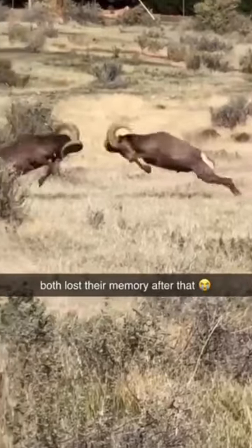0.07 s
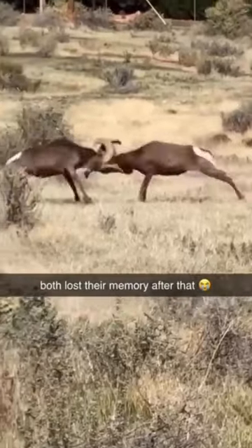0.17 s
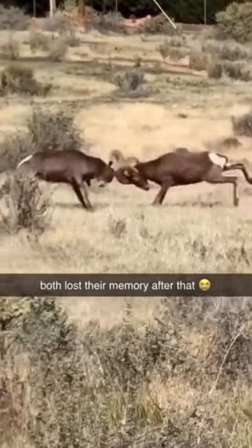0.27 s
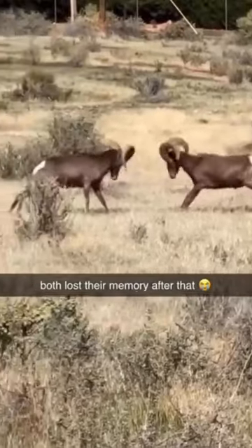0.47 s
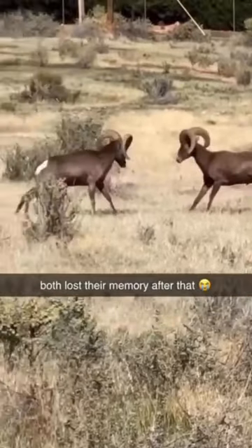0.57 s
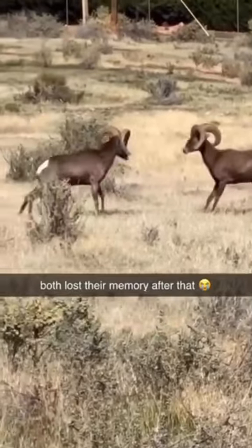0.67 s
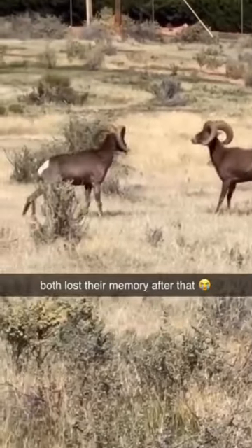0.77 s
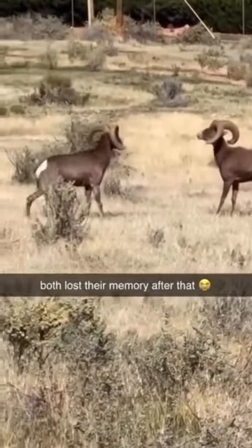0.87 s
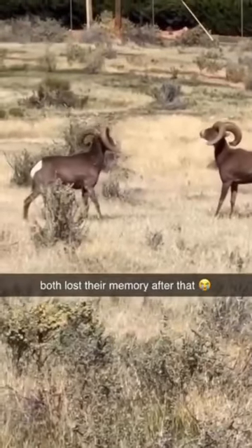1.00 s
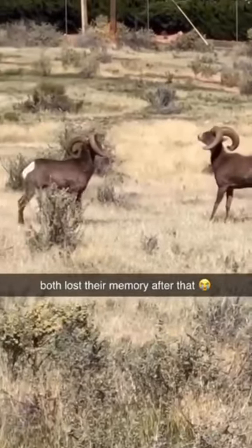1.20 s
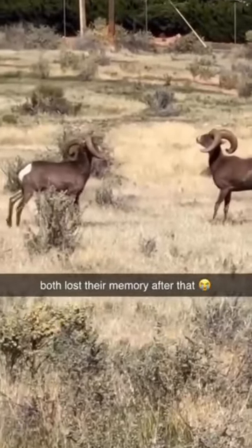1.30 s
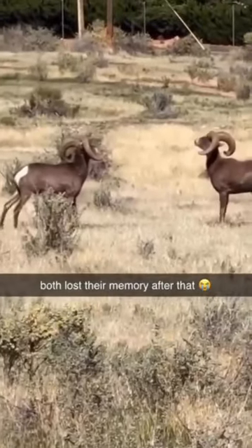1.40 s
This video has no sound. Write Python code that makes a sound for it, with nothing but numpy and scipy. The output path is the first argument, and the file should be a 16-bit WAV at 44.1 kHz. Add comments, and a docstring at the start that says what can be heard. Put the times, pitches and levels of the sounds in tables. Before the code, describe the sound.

One loud crack of clashing horns echoes faintly over light wind and a distant engine.

```python
"""Two bighorn rams butt heads in a dry meadow: five horn contacts within 60 ms, each a snap, a ring
and a splintering crack. Locked ridges grind, skulls knock, bodies thump, hooves brush dry grass.
Scrub scatters the clash and far slopes throw it back, over a light breeze and a distant idling
engine. The crack overloads the microphone."""
import sys
import numpy as np
from scipy import signal
from scipy.fft import rfft, irfft
from scipy.io import wavfile
from scipy.ndimage import uniform_filter1d

SR = 44100
rng = np.random.default_rng(int(sys.argv[2]) if len(sys.argv) > 2 else 0)


def to_wav(s):
    """Save 16-bit WAV."""
    ch = np.atleast_2d(s).T  # columns
    pcm = np.round(np.clip(ch, -1, 1) * 32767)  # PCM
    wavfile.write(sys.argv[1], SR, pcm.astype(np.int16))


N = 63945

# engine harmonics: multiple of rotation rate, level/dB
ENGINE_LINES = [(2, -50), (3, -33), (5, -41), (6, -43)]
# engine rumble: f/Hz, level/dB
RUMBLE_SPECTRUM = [(20, -40), (35, -22), (50, -23), (72, 1.5), (90, -12), (110, -14.5), (140, -12),
                   (175, -13), (210, -16.5), (300, -32), (600, -55)]
# moving air: f/Hz, level/dB
BREEZE_SPECTRUM = [(100, -13), (220, -2.5), (320, -1), (560, -4.5), (900, 1), (1100, -8), (1600, -11),
                   (2300, -19), (4000, -23.5), (7000, -31), (11500, -40.5)]
# breeze strength: t/s, level/dB
BREEZE_LEVELS = [(0, -45.5), (.6, -41.5), (.88, -44.5), (1.08, -41.5), (1.45, -43)]
# hooves in grass: t/s, level/dB, attack/s, decay/s
HOOF_RUSTLES = [(.158, -43, .016, 0.12), (0.234, -28.5, 0.011, 0.036)]
# dry stalks: f/Hz, level/dB
GRASS_SPECTRUM = [(300, 13), (1500, 2.5), (3500, 0.5), (7000, -5), (11500, -16.5)]
# splintering and grinding horn: f/Hz, level/dB
SPLINTER_SPECTRUM = [(200, -30), (540, -35), (680, 5), (1100, 3.5), (2200, -5), (3500, -6.5), (4700, -16),
                     (6000, -20), (7000, -26), (11500, -35)]
# horn contacts: t/s, snap/dB, snap end f/Hz, snap decay/s, relative ring/dB, splinter/dB, splinter decay/s
HORN_CONTACTS = [(0.2225, 2.5, 867, 0.0025, -2, -12.5, 0.0026),
                 (0.2254, -7.5, 1080, 0.00033, -4, -6.5, 0.0036),
                 (0.2419, 1, 1176, 0.001, -3.5, -6.5, 0.0067),
                 (0.2574, -8, 2370, 0.00072, -9.5, -9.5, 0.0035),
                 (.2801, -1, 1525, 0.00096, -8.5, -9.5, 0.0031)]
# horn modes before pitch ratio: f/Hz, level/dB, t60/s
HORN_MODES = [(719, -7, 0.035), (862, -6.5, 0.036), (908, 1, 0.029), (1115, -13.5, 0.028),
              (1396, -7, 0.022), (1670, 2, 0.016), (2150, -7.5, 0.018), (2343, -8.5, 0.013),
              (2890, -18, 0.017), (3510, -11.5, 0.025), (3630, -21, 0.028), (4860, -44, 0.016)]
# blows reaching the skulls: t/s, relative level/dB, pitch ratio
SKULL_BLOWS = [(0.2256, 1, 1.1), (0.2414, -3.5, 1.0), (.2610, -5.5, .92), (.2790, -16, 1.0),
               (0.2938, -7.5, 0.946)]
# skull modes before pitch ratio: f/Hz, level/dB, t60/s
SKULL_MODES = [(168.7, -19.5, 0.27), (258, -15.5, 0.077), (315.8, 0.5, 0.065), (379.4, -1, 0.06),
               (417, -7, 0.051)]
# chest thump, then its rebound: t/s, level/dB
BODY_THUMPS = [(.268, -14.5), (0.317, -28)]
# notch from the ground reflection: f/Hz, gain/dB
GROUND_EQ = [(440, 1.5), (500, -4.5), (560, -7), (630, 1), (700, 0.5), (6000, 0), (11000, 2.5)]
# returns from scrub and slopes: delay/s, level/dB, attack/s, decay/s, low edge/Hz, high edge/Hz
ECHO_PATHS = [(.012, -12.5, 0.011, 0.045, 130, 376), (0.013, -17.5, 0.091, 0.061, 295, 4560),
              (.14, -23.5, .025, 0.13, 297, 2900), (.478, -20.5, 0.019, 0.013, 607, 1210),
              (.47, -28, 0.013, 0.08, 400, 4100), (.67, -30, 0.016, 0.15, 692, 3280)]
# colour of all returns: f/Hz, gain/dB
ECHO_EQ = [(60, -15), (170, 10.5), (310, 1), (450, -1.5), (680, 0.5), (950, 3), (1600, 0), (2600, 1.5),
           (4000, 3.5), (11000, 17)]


def undb(db):
    """Decibels to gain."""
    return 10 ** (np.asarray(db) / 20)


def times():
    """Sample times in s."""
    return np.arange(N) / SR


def unit_rms(x):
    """Scale to rms 1."""
    return x / np.sqrt(np.mean(x ** 2))


def colour(x, spectrum):
    """Filter by (f/Hz, gain/dB) points."""
    hz, db = np.array(spectrum, float).T
    bins_hz = np.maximum(np.arange(N + 1) * SR / (2 * N), 1)
    gain = undb(np.interp(np.log(bins_hz), np.log(hz), db))
    return irfft(rfft(x, 2 * N) * gain)[:N]


def noise(spectrum):
    """Coloured noise, rms 1."""
    return unit_rms(colour(rng.standard_normal(N), spectrum))


def wander(rate_hz):
    """Smooth random curve, spread near 1."""
    step = max(int(SR / rate_hz), 1)
    return uniform_filter1d(np.repeat(rng.standard_normal(N // step + 1), step), step)[:N]


def envelope(start_s, attack_s, decay_s, hold_s=0):
    """Linear rise, hold, exponential fall."""
    age_s = times() - start_s
    return np.clip(age_s / attack_s, 0, 1) * np.exp(-np.maximum(age_s - attack_s - hold_s, 0) / decay_s)


def engine(rotation_hz=28.335):
    """Distant idle: wavering harmonics in a low rumble."""
    turns = np.cumsum(rotation_hz * (1 + 0.0074 * wander(9.02))) / SR
    lines = 0
    for multiple, db in ENGINE_LINES:
        amplitude = np.sqrt(2) * undb(db + 0.84 * wander(11.37))
        lines += amplitude * np.sin(2 * np.pi * (multiple * turns + rng.random()))
    return lines + undb(-36.5) * noise(RUMBLE_SPECTRUM)


def breeze():
    """Soft air over the meadow, swelling and easing."""
    at_s, db = np.array(BREEZE_LEVELS).T
    return noise(BREEZE_SPECTRUM) * undb(np.interp(times(), at_s, db) + 0.51 * wander(18.1))


def grass():
    """Hooves brush through dry stalks."""
    swish = sum(undb(db) * envelope(start_s, attack_s, decay_s)
                for start_s, db, attack_s, decay_s in HOOF_RUSTLES)
    return swish * noise(GRASS_SPECTRUM) * undb(3.1 * wander(600))


def horn_grind():
    """Ridges rub while the horns are locked."""
    locked = envelope(start_s=0.215, attack_s=0.0092, decay_s=0.01, hold_s=0.065)
    return undb(-24.5) * noise(SPLINTER_SPECTRUM) * undb(2.5 * wander(500)) * locked


def snap(start_s, end_hz, decay_s, start_hz=3000, fall_s=0.00069):
    """Bending waves cross the horn treble first: a falling chirp."""
    age_s = np.maximum(times() - start_s, 0)
    cycles = end_hz * age_s + (start_hz - end_hz) * fall_s * (1 - np.exp(-age_s / fall_s))
    return np.sin(2 * np.pi * cycles) * envelope(start_s, attack_s=0.00031, decay_s=decay_s)


def ring(start_s, modes, pitch_ratio, contact_s):
    """Damped modes that build up over the contact time."""
    age_s = np.maximum(times() - start_s, 0)
    swing = sum(undb(db - 60 * age_s / t60_s) * np.sin(2 * np.pi * hz * pitch_ratio * age_s)
                for hz, db, t60_s in modes)
    return swing * np.minimum(age_s / contact_s, 1)


def horn_clacks():
    """Each contact snaps, rings the horns and splinters."""
    clacks = np.zeros(N)
    for start_s, snap_db, end_hz, snap_decay_s, ring_db, splinter_db, splinter_decay_s in HORN_CONTACTS:
        clacks += undb(snap_db) * snap(start_s, end_hz, snap_decay_s)
        clacks += undb(ring_db - 3.5) * ring(start_s, HORN_MODES, pitch_ratio=0.95, contact_s=0.0012)
        burst = envelope(start_s, attack_s=0.0012, decay_s=splinter_decay_s)
        clacks += undb(splinter_db) * noise(SPLINTER_SPECTRUM) * burst
    return clacks


def skull_knocks():
    """Blows ring the low, hollow skull modes."""
    return sum(undb(db - 4) * ring(start_s, SKULL_MODES, pitch_ratio, contact_s=0.0025)
               for start_s, db, pitch_ratio in SKULL_BLOWS)


def body_thumps(pitch_hz=71.2, width_s=0.01):
    """Chests take the shock, then rebound: deep, soft pulses."""
    thumps = np.zeros(N)
    for peak_s, db in BODY_THUMPS:
        offset_s = times() - peak_s
        pulse = np.exp(-0.5 * (offset_s / width_s) ** 2)
        thumps += undb(db) * np.cos(2 * np.pi * pitch_hz * offset_s) * pulse
    return thumps


def echoes(clash):
    """Scrub and slopes return the clash, band-limited and smeared."""
    response = np.zeros(N)
    for delay_s, db, attack_s, decay_s, low_hz, high_hz in ECHO_PATHS:
        band = signal.butter(2, [low_hz, high_hz], "bandpass", fs=SR, output="sos")
        scatter = signal.sosfilt(band, rng.standard_normal(N))
        response += undb(db) * scatter * unit_rms(envelope(delay_s, attack_s, decay_s)) / np.sqrt(N)
    return colour(signal.fftconvolve(clash, response)[:N], ECHO_EQ)


def scene():
    """Open field, clash and soft-limited echoes; mono."""
    clash = colour(horn_grind() + horn_clacks() + skull_knocks() + body_thumps(), GROUND_EQ)
    return (clash + echoes(np.tanh(clash)) + grass() + engine() + breeze())[None, :]


def record(dry, cutoff_hz=11700):
    """The microphone rounds off peaks and cuts the top."""
    clipped = dry / (1 + dry ** 4) ** (1 / 4)
    lowpass = signal.cheby1(12, 0.1, cutoff_hz, fs=SR, output="sos")
    return signal.sosfilt(lowpass, clipped)


dry = scene()
out = record(dry)
to_wav(out)
```